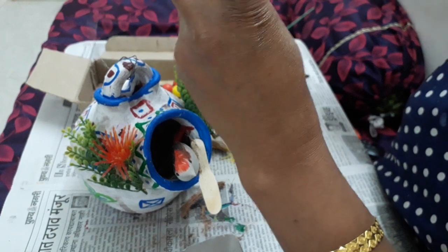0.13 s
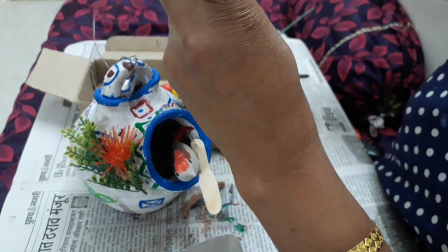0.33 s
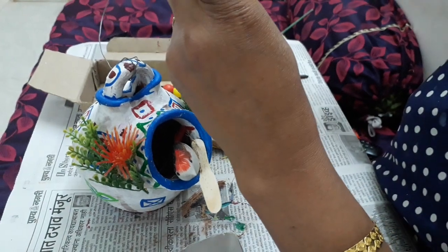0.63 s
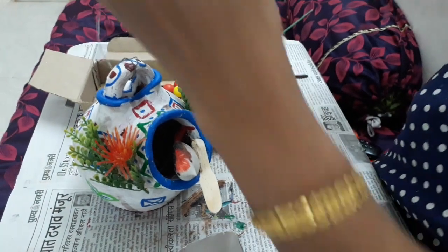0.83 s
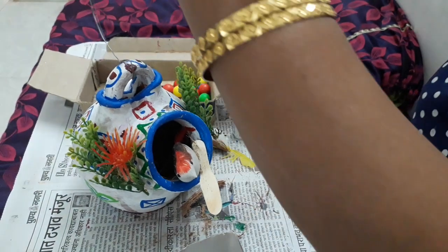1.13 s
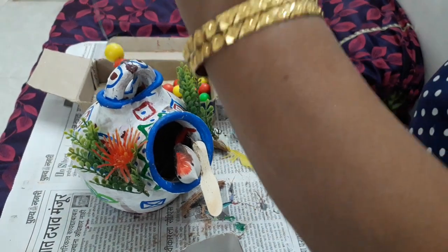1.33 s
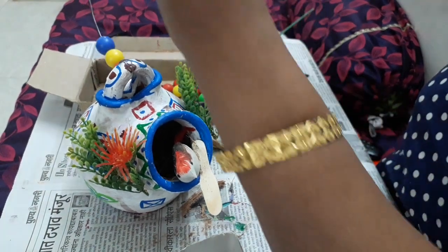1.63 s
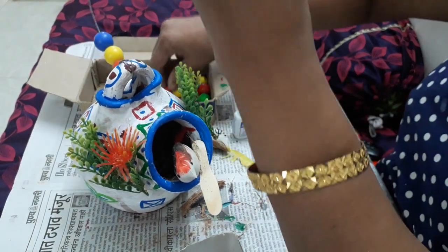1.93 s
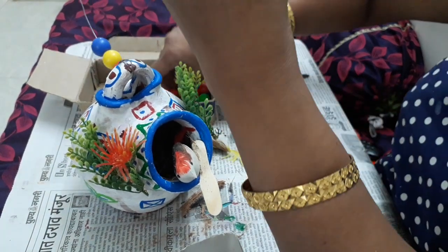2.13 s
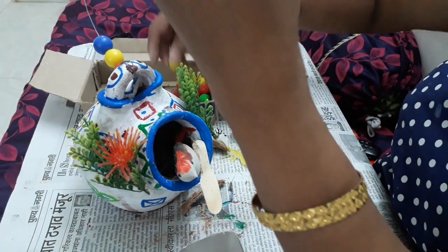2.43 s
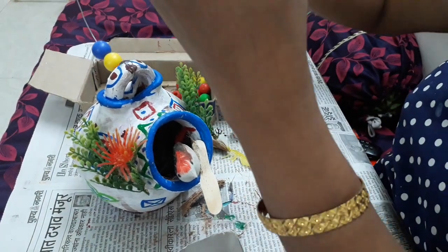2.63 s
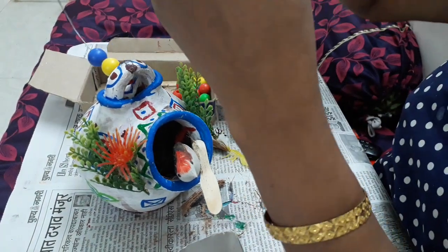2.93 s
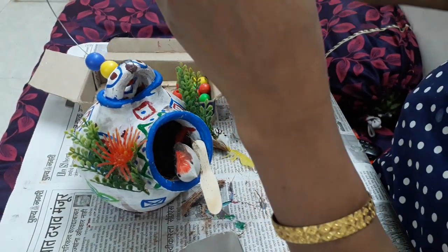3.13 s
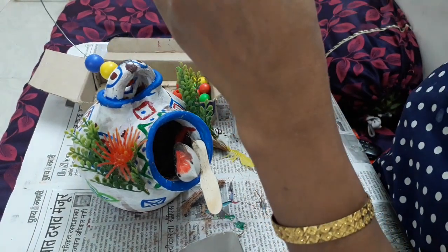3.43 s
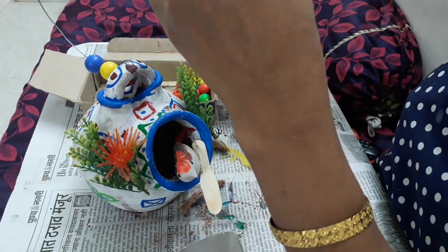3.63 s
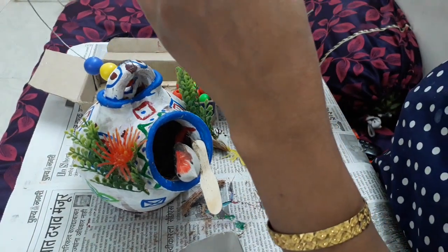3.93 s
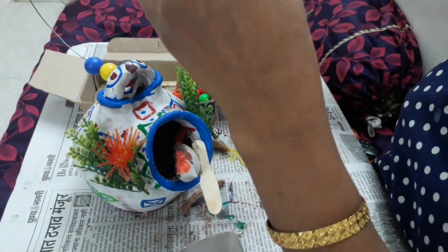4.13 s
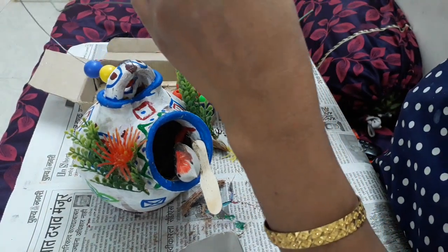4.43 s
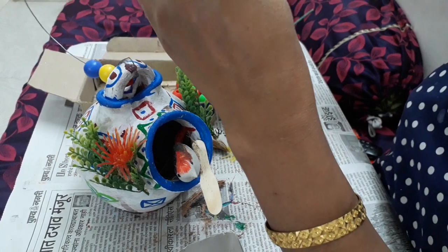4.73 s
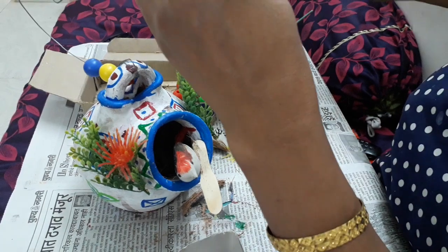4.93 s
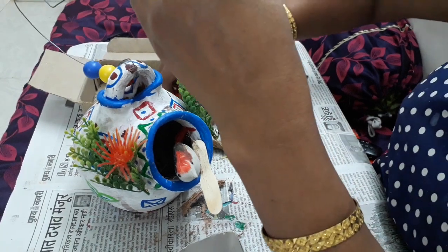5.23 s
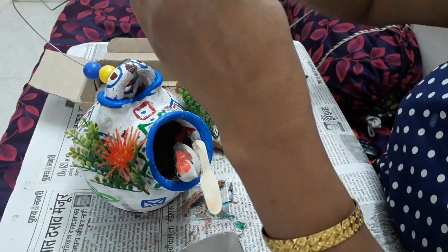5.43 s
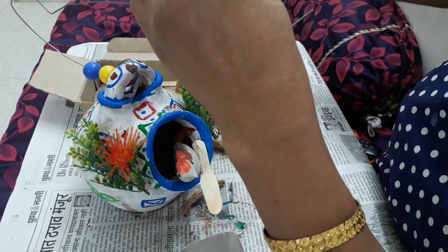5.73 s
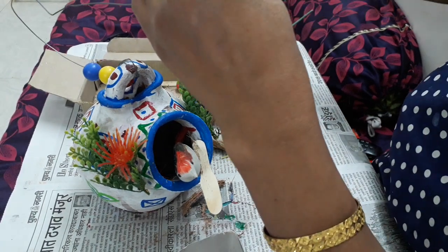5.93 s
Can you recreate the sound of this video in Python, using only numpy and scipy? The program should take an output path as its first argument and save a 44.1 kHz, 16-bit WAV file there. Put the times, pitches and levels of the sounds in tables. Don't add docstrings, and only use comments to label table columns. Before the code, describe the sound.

A phone near the hands picks up bright bangle jingling, small bead pings and dry snaps, then two loud clinks. Bead stirring and hollow cardboard knocks come next, softening into a quiet stretch with barely audible wire squeaks. A single free bangle rings out late, then beads rattle briefly. Small indoor room, low fan and distant traffic, noise suppression thinning the background.

```python
import sys
import numpy as np
from scipy import signal
from scipy.io import wavfile
from scipy.ndimage import uniform_filter1d

SR = 44100
rng = np.random.default_rng(int(sys.argv[2]) if len(sys.argv) > 2 else 0)


def ratio(d):
    e = np.asarray(d, float) / 20
    return 10 ** e


def unload_audio(sound):
    columns = np.transpose(np.atleast_2d(sound))
    steps = np.round(np.clip(columns, -1, 1) * 32767)
    wavfile.write(sys.argv[1], SR, steps.astype(np.int16))


N = 268216

# nearest moment in seconds, level in dB, length in seconds.
PASSES = [
    (0.497, -64, 0.3),
    (.86, -64, 0.072),
    (2.275, -66, 0.16),
    (2.651, -64.5, 0.28),
    (3.096, -62.5, 0.5),
    (3.791, -65, 0.091),
    (4.038, -68.5, .2),
    (4.418, -65, 0.037),
    (4.907, -69.5, 0.39),
]
# time in seconds, gain in dB.
SUPPRESSOR = [(0, 0.5), (.6, -4.5), (.75, -1), (1, -7), (1.5, -4), (1.9, -18), (2.1, -20), (2.5, -17.5),
              (3.5, -23), (4.4, -37), (4.55, -13), (4.9, -28), (6.1, -42)]
# time in seconds, turns per second in Hz.
SHAFT_SPEED = [(0, 24.38), (.7, 24.39), (1.1, 24.99), (2, 24.82), (6.1, 24.6)]
# multiple of the shaft speed, level in dB.
SHAFT_ORDERS = [(3, -14), (4, -7), (6, -8), (7, -14), (9, -18), (12, -20)]
# time in seconds, level in dB.
BLADE_SWAY = [(0, -52.5), (.15, -50.5), (.34, -54), (.55, -68), (.68, -51), (.77, -56), (.85, -77),
              (.93, -59), (1.1, -58), (1.18, -63), (1.29, -78), (1.46, -66), (1.56, -66), (1.68, -81),
              (1.92, -70), (2.04, -63.5), (2.15, -75), (6.1, -94.5)]
# frequency in Hz, level in dB per Hz.
WASH = [(88, -31.5), (150, -3), (221, -9.5), (382, -12.5), (474, -10), (741, -15.5), (993, -23),
        (1210, -24), (2080, -16), (2250, -15), (2840, -23), (3460, -18), (4540, -29), (5100, -19),
        (15800, -52.5)]
# frequency in Hz, width in Hz, level in dB.
HOUSING = [(2323, 70, -11), (4940, 380, -11), (990, 170, -13), (498, 11, -15.5), (393.7, 14, -21)]
# frequency in Hz, level in dB per Hz.
HISS = [(76, -29.5), (130, -0.5), (156, -5), (194, -2), (268, -10.5), (499, -10.5), (746, -17),
        (1010, -17.5), (1450, -21.5), (1630, -20.5), (2540, -23), (15800, -26)]
# frequency in Hz, width in Hz, level in dB.
MOTOR_LINES = [(493, 14, -85), (394, 9, -90)]
# frequency in Hz, level in dB per Hz.
APART = [(24, -32), (40, -2.5), (117, -3), (327, -9.5), (390, -5.5), (464, -4), (912, -11.5), (4090, -7),
         (15800, -9)]
# frequency in Hz, t60 in seconds.
ROOM_DECAY = [(300, 0.32), (1000, 0.28), (3000, 0.12), (8000, 0.25), (15000, 0.023)]
# start in seconds, level in dB, brightness in dB.
TICKS = [
    (1.62, -68.5, -3),
    (2.605, -67.5, 2.5),
    (3.609, -69, -7),
    (4.61, -65.5, -2.5),
    (5.605, -67, -4),
]
# frequency in Hz, level in dB per Hz.
CLOCK_COLOUR = [(590, -9), (1000, -12), (1150, -7), (1390, -5), (1610, 1), (1950, -7.5), (2190, -3),
                (2530, -11), (3270, -9), (3790, -3), (4480, -10), (5310, -7.5), (7290, -20.5), (9200, -7),
                (12500, -27), (16200, -36), (22000, -120)]
# start in seconds, length in
# seconds, start in Hz, end in Hz, level in dB.
SQUEAKS = [
    (2.826, 0.21, 7290, 7290, -79),
    (2.952, 0.053, 15600, 14400, -74),
    (5.03, 0.062, 7490, 7500, -85.5),
    (5.061, 0.11, 11550, 11200, -75),
    (5.256, 0.15, 7100, 7660, -81.5),
    (5.48, 0.051, 8670, 8700, -87),
    (3.669, 0.25, 1092, 1037, -82.5),
    (4.48, 0.35, 620, 543, -75.5),
]
# start in seconds, length in seconds, start in Hz, end in Hz, level in dB.
RUBS = [
    (3.04, 0.19, 8700, 9500, -79),
    (3.0, 0.2, 2600, 5400, -86),
    (0.82, 0.2, 1500, 1600, -72),
    (4.376, 0.087, 2970, 2960, -83),
    (4.66, .09, 5600, 5800, -76),
]
# frequency in Hz, level in dB, t60 in seconds.
BOX_MODES = [(222, -1.5, .12), (290.6, -6.5, 0.14), (360.3, -4.5, 0.13), (440, -3.5, 0.074),
             (548, -3, 0.077), (609, -7, .1), (721, 4, 0.036), (883, 12.5, 0.019), (1000, 6.5, 0.019),
             (1116, 1.5, 0.024), (1320, 2, 0.038), (1425, 3, 0.031), (1590, 3, 0.027), (1750, -9, 0.057),
             (1876, 7, 0.017), (2320, 2, 0.022), (2820, -28, 0.073), (3060, -2, .03), (3728, -18.5, 0.09)]
# start in seconds, peak in dB, strongest Hz, ring as a share of the free decay.
KNOCKS = [(0.678, -39.5, 360, 0.84), (0.925, -76, 380, 0.49), (1.295, -37, 1920, 0.6),
          (1.334, -39.5, 1700, 0.97), (1.501, -53, 414, 0.54), (1.921, -52.5, 883, 0.98),
          (1.933, -46.5, 925, 0.96), (1.9935, -33, 980, 0.4), (2.0255, -34.5, 730, 0.54),
          (2.027, -41.5, 1250, 0.29), (2.082, -49, 880, .5), (2.138, -51, 950, .5),
          (2.176, -47, 1750, 0.42), (2.153, -51, 545, 0.44), (2.197, -53, 530, 0.49),
          (2.045, -45, 1260, 0.7), (2.061, -43.5, 1120, 0.56), (2.131, -49, 1590, 0.67),
          (2.151, -34, 1095, 0.31), (2.189, -51, 1500, 0.17), (2.269, -43, 800, 0.43),
          (2.284, -54, 524, 0.52), (2.389, -45, 590, 0.36), (2.42, -50.5, 598, 0.33),
          (2.424, -46, 730, 0.33), (2.46, -50.5, 412, 0.34), (1.995, -40, 519.3, 0.3),
          (5.236, -54, 801, 0.48), (2.44, -48, 440, 0.27), (2.276, -50.5, 1310, 0.6),
          (2.767, -66, 498, 0.8), (3.345, -67.5, 484, 0.36), (3.422, -51.5, 447, 0.67),
          (5.147, -45.5, 1403, 0.8), (5.278, -43.5, 1340, 0.38)]
# start in seconds, peak in dB, strongest Hz, ring share.
THUDS = [(0.688, -44, 330, 0.76), (1.02, -56.5, 205, 3.2), (1.297, -47.5, 300, 0.22),
         (1.338, -46, 310, 0.75), (1.455, -40, 1970, 1.4), (1.924, -52, 273, 2.9), (2.081, -51, 493, 0.52),
         (4.470, -47, 440, 1.25), (4.497, -58, 483, 1.8), (4.502, -56, 580, 1.2), (5.168, -41, 1334, 0.51),
         (5.171, -33.5, 1220, 0.61), (5.188, -41, 1460, 0.77)]
# strongest moment in seconds, scratch in dB, body in dB, fade in seconds.
STIRS = [
    (1.938, -53.5, -58.5, 0.13),
    (1.998, -59.5, -56, 0.18),
    (2.153, -60.5, -57.5, 0.1),
    (2.2, -63, -61.5, 0.14),
    (2.3, -79, -63, 0.23),
    (2.429, -76, -67, 0.071),
    (5.174, -60.5, -59.5, 0.023),
    (5.201, -61, -61.5, 0.21),
    (5.255, -66, -71, 0.036),
]
# frequency in Hz, level in dB per Hz.
SCRATCH = [(1060, -26), (1800, 3.5), (1920, -10), (2540, -0.5), (2950, -4.5), (3650, 2), (4400, -1),
           (6660, -11), (9850, -6), (13100, -14), (15800, -18)]
# start in seconds, peak in dB, frequency in Hz, t60 in seconds.
PINGS = [(.787, -52, 6430, .08), (.803, -49, 3703, 0.049), (1.458, -44.5, 2630, 0.43),
         (.832, -48, 8100, 0.17), (.849, -42.5, 5200, 0.15), (.888, -43, 5380, 0.17),
         (.889, -37, 7300, .06), (.87, -55, 2600, .15), (.9, -39, 5970, .08), (.929, -46, 3650, 0.046),
         (1.106, -47, 2550, .3), (1.385, -45, 2670, .15), (0.906, -53, 1954, 0.19), (.923, -44, 8979, 0.15),
         (.944, -44, 8100, 0.06), (.953, -50, 9000, 0.13), (.953, -46, 7000, 0.13),
         (1.015, -53, 4950, 0.088), (1.066, -44, 3768, .2), (1.066, -49.5, 3478, .4),
         (1.072, -46, 2630, 0.3), (1.105, -44.5, 4732, .2), (1.122, -42, 3750, .1),
         (1.154, -46.5, 3488, .2), (1.194, -42.5, 7644, .2), (1.203, -40.5, 4909, .14),
         (1.21, -47, 2556, .45), (1.21, -51, 3466, .4), (1.27, -43, 4470, .1), (1.275, -52, 2600, 0.18),
         (1.2964, -25.5, 2630, 0.02), (1.336, -21, 2670, 0.02), (1.337, -33, 3440, .1),
         (1.339, -39, 5857, .1), (1.402, -36, 4750, 0.14), (1.459, -31.5, 4950, 0.079),
         (1.459, -48.5, 3466, 0.26), (1.461, -46, 5361, 0.19), (1.488, -45, 4950, 0.086)]
# start in seconds, peak in dB, frequency in Hz, t60 in seconds.
SNAPS = [(.6985, -41, 3570, 0.015), (0.7156, -43.5, 1470, 0.017), (.7158, -45, 5500, 0.012),
         (2.131, -48, 1910, .025), (2.19, -41, 1690, 0.037), (1.9345, -36.5, 3214, .012),
         (1.5, -44, 2000, 0.014), (2.151, -34, 3220, 0.014), (2.389, -48, 1400, .02),
         (1.978, -43, 9400, .012), (2.1378, -59, 5230, 0.011), (2.334, -51, 1450, .03),
         (2.387, -54, 4950, .012), (2.424, -51, 1423, 0.025), (2.474, -63.5, 1701, .02),
         (5.149, -56.5, 3700, 0.045), (5.153, -38.5, 1390, 0.05), (5.164, -49, 4200, 0.033),
         (5.172, -41.5, 3670, 0.024), (5.278, -49.5, 3750, 0.018), (5.292, -56, 1247, 0.09),
         (1.2968, -45.5, 820, 0.072), (1.337, -46.5, 750, .08), (1.456, -49, 806, 0.055),
         (1.34, -34, 4600, 0.017), (1.126, -35, 4370, .015), (5.15, -52, 2300, 0.056),
         (5.19, -42, 1590, 0.07), (2.045, -47, 1300, .03), (2.3, -58, 1520, .05), (4.4665, -47, 1890, .03),
         (4.467, -50, 1150, .03)]
# frequency in Hz, level in dB, t60 in seconds.
BANGLE = [(1954, -18, .12), (2536, -2, .5), (2630, 0, .45), (2707, -12, .3), (3470, -11, .25),
          (3555, -12, .3), (3726, -8, .36), (3775, -10, .3), (4436, -9, .35), (4544, -12, .35),
          (4738, -7, .35), (4950, -7, .35), (5200, -9, .3), (5345, -8, .38), (5749, -13, .25),
          (5860, -11, .25), (6089, -14, .3), (6390, -14, .25), (6620, -12, .28), (6761, -14, .22),
          (6985, -12, .28), (7250, -16, .28), (7690, -14, .22), (8600, -16, .25), (8980, -19, .25),
          (9400, -17, .22), (9750, -17, .28), (10780, -21, .22), (11280, -21, .22), (11900, -24, .2)]
# frequency in Hz, level in dB, t60 in seconds.
LONE = [(4540, -8, .5), (4735, -6, .36), (4960, 0, 0.22), (5335, -7, 0.35), (5800, -8, 0.12),
        (5895, -9, 0.29), (6089, -9, 0.18), (6401, -9, 0.26), (6600, -7, 0.15), (6982, -4, 0.21),
        (7370, -10, 0.31), (7630, -8, 0.13), (7860, -33, 0.25), (8597, -6, 0.14), (8990, -16, 0.34),
        (9300, -7, 0.18), (9390, -10, 0.18), (9640, -15, 0.3), (9790, -13, 0.35), (10710, -11, 0.17),
        (11290, -9, 0.16), (11700, -25, 0.2), (11950, -14, 0.23), (13020, -22, 0.12)]
# frequency in Hz, level in dB, t60 in seconds.
LONE_LOW = [(2632, -1, .5), (2668, -2, .3), (2789, -12, .45), (2869, -10, .45), (3738, -4, .45),
            (3756, -5, .4)]
# frequency in Hz, level in dB per Hz.
FACETS = [(710, -57.5), (1200, -30), (1930, -24.5), (2100, -29.5), (2580, -2), (3150, -10), (3400, -9),
          (3680, 0), (4150, -5), (4880, 1), (5750, -7.5), (9620, -14.5), (15800, -29)]
# start in seconds, peak in dB, brightness in dB per octave, shimmer in dB,
# ring as a share of the free decay.
CLINKS = [(0.1308, -55.5, 4.5, 11, 0.46), (0.146, -53, 21, -4, 0.42), (0.163, -47.5, 4.5, 0.5, 0.7),
          (0.6994, -64.5, 15, 1, 0.89), (0.716, -63, 5, 16.5, 0.61), (0.7876, -50.5, 15, -8, 0.51),
          (0.8041, -46.5, 2, 3, 0.6), (0.8785, -39, 6.5, -19, 0.72), (0.8889, -39.5, 5, -15, 0.68),
          (0.9243, -39.5, 4.5, 0.5, 0.84), (1.067, -43.5, 7.5, -16.5, 0.47), (1.1054, -35.5, 8.5, -8, 0.16),
          (1.1232, -37, 10, -5.5, 0.52), (1.156, -42, 5, -12, 0.94), (1.2102, -42, 5.5, -5, 0.6),
          (1.2696, -41.5, 0.5, 2.5, .7), (1.296, -22, -4.5, -5, 0.34), (1.3359, -16.5, -11, -3.5, 0.3),
          (1.3387, -30, 4.5, 0, 0.24), (1.399, -35.5, 1.5, 4.5, 0.41), (1.457, -31, 2, -6, 0.71),
          (3.9188, -78, -6, 14.5, 0.25)]
# start in seconds, peak in dB, brightness in dB per octave, shimmer in dB, ring share.
LONE_CLINK = (4.4665, -23, 4, -5.5, 0.7239)
# strongest moment in seconds, level in dB,
# brightness in dB per octave, build in seconds, fade in seconds.
JINGLE = [
    (.168, -38.5, 15, 0.031, 0.029),
    (.8, -50.5, 14, .2, 0.24),
    (.894, -40, 14, 0.117, 0.2),
    (1.07, -36.5, 5.5, .015, 0.31),
    (1.13, -35, 8.5, 0.17, 0.023),
    (1.214, -40, 4, .05, 0.041),
    (1.288, -39, 2, .08, 0.013),
    (1.385, -39.5, 6, .01, 0.081),
]

LIGHT_DB = 1.4


def evened(x):
    return x / np.sqrt(np.mean(x ** 2) + 1e-20)


def read(points, hz):
    f, value = np.transpose(points)
    return np.interp(np.log(hz + 1), np.log(f + 1), value)


def add(mix, s, sound):
    part = mix[round(s * SR):][:len(sound)]
    part += sound[:len(part)]


def above(x, hz):
    return signal.sosfilt(signal.butter(4, hz, "high", fs=SR, output="sos"), x)


def coloured(points, patchy_db, x=None):
    source = rng.standard_normal(N) if x is None else x
    hz, t, z = signal.stft(source, SR, nperseg=512, noverlap=384)
    patches = uniform_filter1d(rng.standard_normal(z.shape), size=6, axis=0)
    patches = evened(uniform_filter1d(patches, size=14, axis=1))
    gain = ratio(read(points, hz)[:, None] + patchy_db * patches)
    return evened(signal.istft(z * gain, nperseg=512, noverlap=384)[1][:N])


def band(hz, width, count=N):
    r = np.exp(-np.pi * width / SR)
    noise = rng.standard_normal((count + SR, 2)) @ [1, 1j]
    slow = signal.lfilter([1], [1, -2 * r, r * r], noise)[SR:]
    turns = np.cumsum(hz * np.ones(count)) / SR
    return evened((slow * np.exp(2j * np.pi * turns)).real)


def grit(per_s, spread_db):
    u, size, sign = rng.random(N), rng.exponential(1, N), rng.standard_normal(N)
    return (u < per_s / SR) * ratio(spread_db * np.minimum(size, 4)) * np.sign(sign)


def rings(modes, colour_db, damping, length, rise=0.0003, spread=.012, step=0, low_rise=0, clean_hz=3000):
    hz, db, t60 = np.transpose(modes)[:, :, None]
    t = np.arange(int(length * SR)) / SR
    high = hz > clean_hz
    phase, detune = rng.random((2, 3, len(hz), 1))
    cluster_hz = hz * (1 + spread * (detune - .5) * high)
    swing = np.sin(2 * np.pi * (cluster_hz * (t - step) + phase * high)).sum(0)
    swing /= np.where(high, np.sqrt(3), 3)
    onset = np.sin(np.minimum(t / (rise + low_rise * ~high), 1) * np.pi / 2) ** 2
    return ratio(db + colour_db - 60 * t / (t60 * damping)) * onset * swing


def crack(db, t60):
    return ratio(db - 60 * np.arange(1500) / SR / t60) * rng.standard_normal(1500)


def stroke(s, db, build, fade, drop_db=27):
    t = np.arange(N) / SR - s
    return ratio(db - drop_db * np.maximum(-t / build, t / fade))


def suppressor_db():
    return np.interp(np.arange(N) / SR, *np.transpose(SUPPRESSOR))


def traffic():
    power = ratio(-72) ** 2
    for s, db, length in PASSES:
        power = power + stroke(s, db, length, length, drop_db=11.5) ** 2
    return np.sqrt(power) * evened(band(64, 25) + .5 * band(100, 31))


def hiss():
    lines = sum(ratio(db) * (band(hz, w) + band(hz, .8)) for hz, w, db in MOTOR_LINES)
    return ratio(-75) * coloured(HISS, 0.72) + lines


def wash():
    cut_db = suppressor_db()
    full = coloured(WASH, 1.3) + sum(ratio(db) * band(hz, w) for hz, w, db in HOUSING)
    low = signal.sosfiltfilt(signal.butter(2, 400, fs=SR, output="sos"), full)
    return ratio(-56 + cut_db) * (low + ratio(0.39 * cut_db) * (full - low))


def fan():
    t = np.arange(N) / SR
    shaft_hz = np.interp(t, *np.transpose(SHAFT_SPEED))
    turns = np.cumsum(shaft_hz) / SR
    orders = np.zeros(N)
    for k, db in SHAFT_ORDERS:
        pure = np.sin(2 * np.pi * (k * turns + rng.random()))
        orders += ratio(db) * (pure + .45 * band(k * shaft_hz, 6.0))
    hum_db = -54 - 23 * (1 - np.exp(-(t / 1.3) ** 3))
    hum = ratio(hum_db) * (np.sqrt(2) * orders + 0.24 * band(125, 84))
    blade_gain = ratio(np.interp(t, *np.transpose(BLADE_SWAY)))
    return hum + blade_gain * np.sqrt(2) * np.sin(10 * np.pi * turns)


def clock():
    plain, bright = np.zeros((2, N))
    puff, t = coloured(CLOCK_COLOUR, 2.4), np.arange(9000) / SR
    for s, db, bright_db in TICKS:
        shape = ratio(db) * np.sin(np.minimum(t / 0.05, 1) * np.pi / 2) ** 2 / (1 + (t / 0.093) ** 4)
        add(plain, s, shape)
        add(bright, s, shape * (ratio(bright_db) - 1))
    return plain * puff + bright * above(puff, 2340)


def room(x):
    taps = np.zeros(SR // 2)
    at = np.arange(150, SR // 2 - 20, 20)
    taps[at + rng.integers(0, 20, len(at))] = rng.choice([-1., 1.], len(at))
    hz, t, z = signal.stft(taps, SR, nperseg=256)
    tail = signal.istft(z * ratio(-60 * t / read(ROOM_DECAY, hz)[:, None]), SR, nperseg=256)[1]
    return signal.fftconvolve(x, tail / np.linalg.norm(tail))[:N]


def squeaks():
    out = np.zeros(N)
    for rows, width_hz in ((SQUEAKS, 220), (RUBS, 1000)):
        for s, length, hz0, hz1, db in rows:
            count = int(length * SR)
            whistle = band(np.linspace(hz0, hz1, count), width_hz, count)
            add(out, s, ratio(db) * whistle * np.hanning(count))
    return out


def knocks():
    out, hz = np.zeros(N), np.transpose(BOX_MODES)[0][:, None]
    for rows, crack_db, focus_db in ((KNOCKS, -17, 18.5), (THUDS, -30.5, 25.5)):
        for s, db, top_hz, damping in rows:
            colour_db = -focus_db * abs(np.log2(hz / top_hz)) + 1.5 * rng.standard_normal(hz.shape)
            ring = rings(BOX_MODES, colour_db, damping, 0.22, rise=.002).sum(0)
            ring /= abs(ring).max()
            add(ring, 0, np.convolve(above(crack(crack_db, 0.007), 1200), np.hanning(7) / 2))
            add(out, s, ratio(db) * ring)
    return out


def stirring():
    out = np.zeros(N)
    tapped = rings(BOX_MODES[4:15], np.linspace(-2, .3, num=11)[:, None], 0.27, .1)
    taps = evened(sum(signal.oaconvolve(grit(600, 2.5), ring)[:N] for ring in tapped))
    scratch = coloured(SCRATCH, 0.97, grit(4000, 2.7))
    for s, scratch_db, body_db, fade in STIRS:
        out += stroke(s, 0, 0.052, fade) * (ratio(body_db) * taps + ratio(scratch_db - 2.5) * scratch)
    return out


def box():
    return above(knocks() + stirring(), 73)


def beads():
    out, t = np.zeros(N), np.arange(5000) / SR
    for s, db, hz, t60 in PINGS:
        ring = rings([(hz, 0, t60)], 0, 0.81, .4, spread=0.016)[0]
        rough = .7 * (hz > 4200)
        flutter = band(hz, 210, count=5000) * np.minimum(t / .002, 1) * ratio(-3 - 60 * t / t60)
        add(out, s, ratio(db) * (1 - rough) * ring / abs(ring).max())
        add(out, s, ratio(db) * rough * flutter)
    for s, db, hz, t60 in SNAPS:
        decay = ratio(db - 8 - 60 * t / t60)
        add(out, s, decay * np.minimum(t / 0.0011, 1) * band(hz, 0.29 * hz, count=5000))
    return out


def clinks():
    out, t = np.zeros(N), np.arange(int(.6 * SR)) / SR
    facets = coloured(FACETS, 2.5)
    facets_top = above(facets, 5770)
    for s, db, bright_db, shimmer_db, share in CLINKS + [LONE_CLINK]:
        if s == LONE_CLINK[0]:
            modes = np.array(LONE_LOW + LONE)
            contact = dict(spread=0.0214, clean_hz=3900, rise=0.0019)
        else:
            modes = np.array(BANGLE)
            contact = dict(spread=.006, step=.0085, low_rise=.004)
        octave = np.log2(modes[:, :1] / 4000)
        modes[:, 2] = np.minimum(modes[:, 2], .7)
        spot_db = 2.5 * np.clip(octave + 1.0, .1, 1) * rng.standard_normal(octave.shape)
        spot_db -= LIGHT_DB * np.clip(bright_db - 2.5, 0, 5) * (octave < -.5) * 2
        ring = rings(modes, min(bright_db, 7) * octave + spot_db, share, .5, **contact).sum(0)
        add(out, s, ratio(db) * ring / abs(ring).max())
        at = slice(round(s * SR), round(s * SR) + len(t))
        shine = facets[at] + (ratio(2.8 * bright_db) - 1) * facets_top[at] * ratio(-60 * t / 0.35)
        shine_gain = ratio(db + shimmer_db - 10.5 - 60 * t / (0.49 * share)) * np.minimum(t / 0.00025, 1)
        add(out, s, shine_gain * evened(shine))
    return out


def jingle():
    octaves = np.log2(np.transpose(BANGLE)[0] / 4000)
    scrape = coloured(FACETS, 2.0, grit(5000, 2.2))
    scrape_top = above(scrape, 6300)
    damping = np.where(octaves < -.5, .55, .33)[:, None]
    touched = rings(BANGLE, 0, damping, 0.2, spread=.012)
    chatter = [signal.oaconvolve(grit(800, 3.4), ring)[:N] for ring in touched]
    power = np.array([stroke(s, db, build, fade) ** 2 for s, db, _, build, fade in JINGLE]) + 1e-30
    bright_db = np.transpose(JINGLE)[2] @ power / power.sum(0)
    tilted = np.zeros(N)
    for mode, octave in zip(chatter, octaves):
        light_db = LIGHT_DB * (octave < -.5) * np.clip(bright_db, 0, 7)
        tilted += mode * ratio(octave * np.minimum(bright_db, 7) - light_db)
    tilted = evened(tilted) + 0.93 * (scrape + (ratio(bright_db) - 1) * scrape_top)
    loudness = uniform_filter1d(tilted ** 2, size=3000) + 1e-20
    return ratio(-5.5) * tilted * np.sqrt(power.sum(0) / loudness)


def bangles():
    return above(clinks() + jingle(), 1200)


def scene():
    air = traffic() + hiss() + wash() + fan()
    card = box()
    metal = bangles() + beads()
    echo = room(ratio(-11) * metal + ratio(-8.0) * card)
    mid = air + clock() + echo + squeaks() + card + metal
    side = ratio(-79.5) * coloured(APART, 0.9) + ratio(-44.0) * np.roll(mid, 40)
    return np.array([mid + side, mid - side])


def band_limit(x):
    return signal.sosfilt(signal.butter(12, 16480, fs=SR, output="sos"), x)


def record(dry):
    lowpass = signal.firwin(511, 15850, window=("kaiser", 9), fs=SR)[None]
    heard = signal.oaconvolve(above(dry, 40), lowpass, "same")
    return band_limit(heard)


dry = scene()
out = record(dry)
unload_audio(out)
```